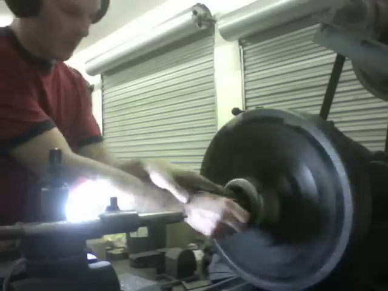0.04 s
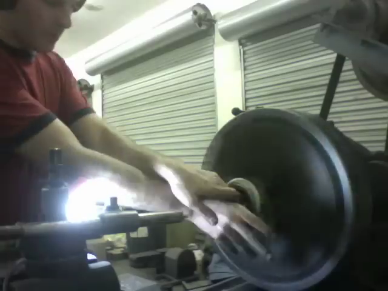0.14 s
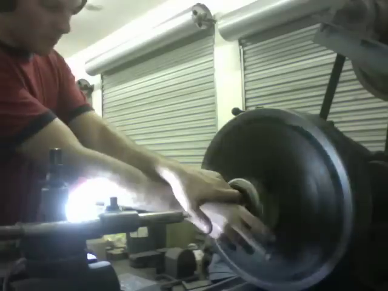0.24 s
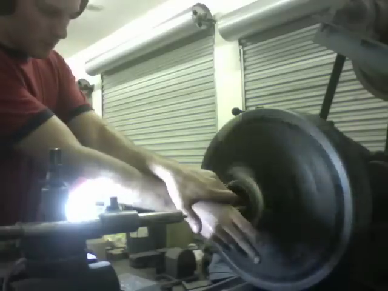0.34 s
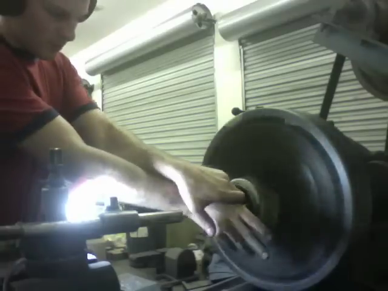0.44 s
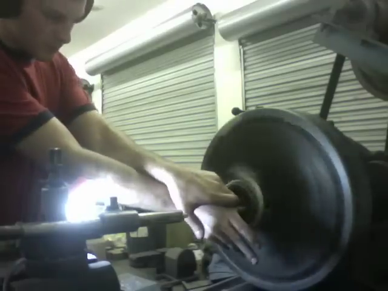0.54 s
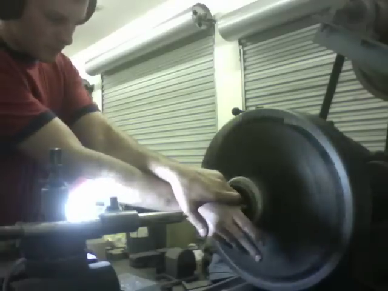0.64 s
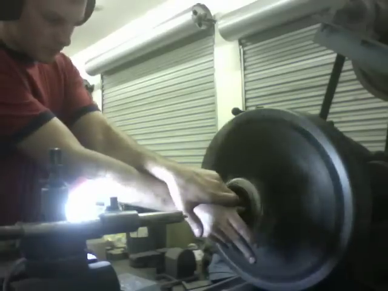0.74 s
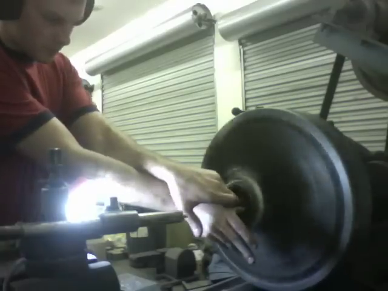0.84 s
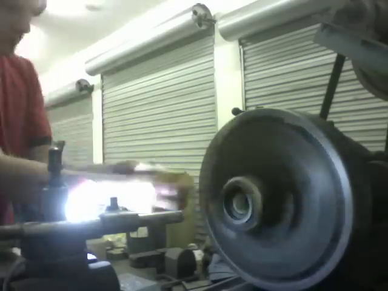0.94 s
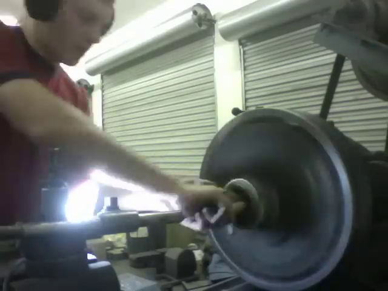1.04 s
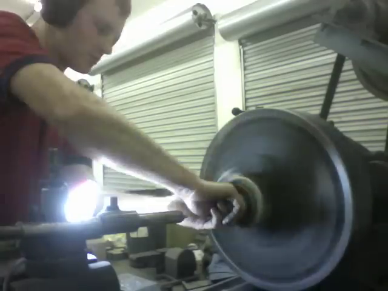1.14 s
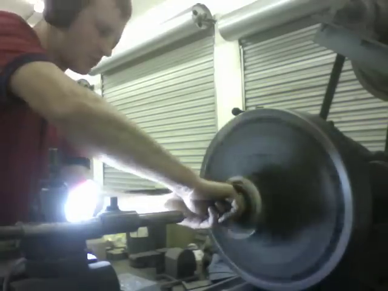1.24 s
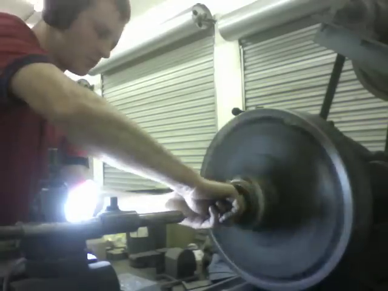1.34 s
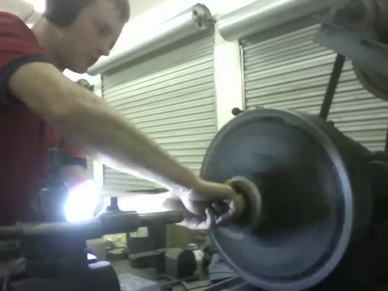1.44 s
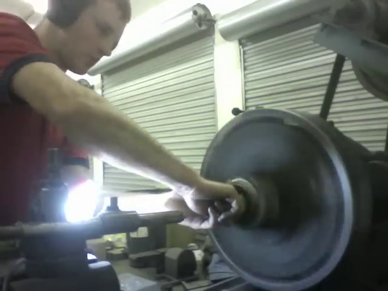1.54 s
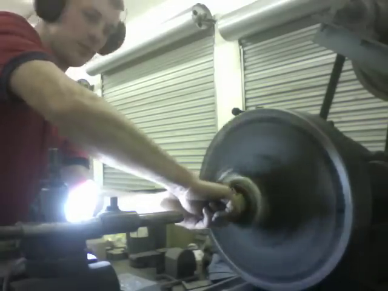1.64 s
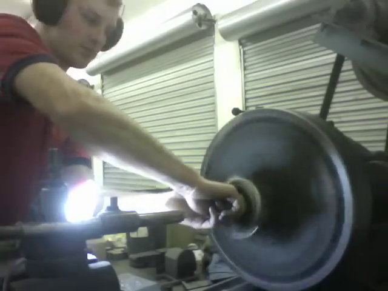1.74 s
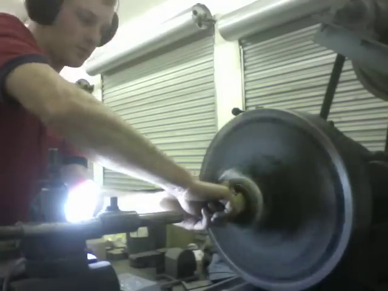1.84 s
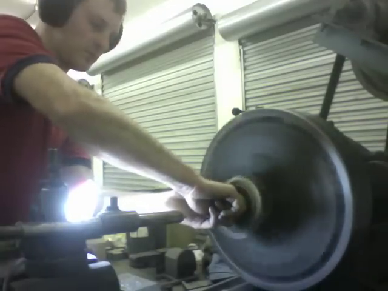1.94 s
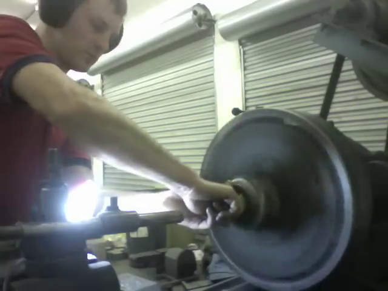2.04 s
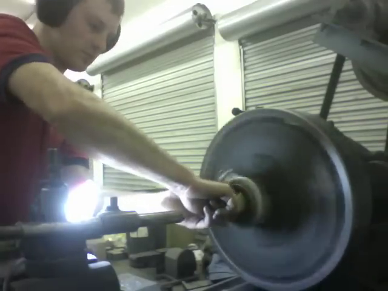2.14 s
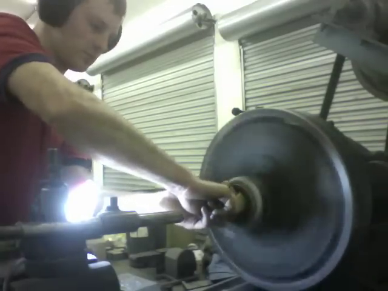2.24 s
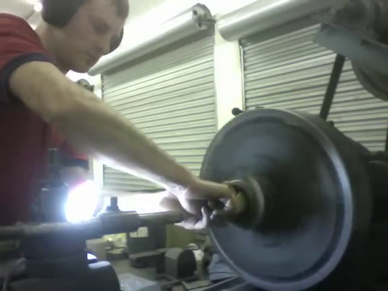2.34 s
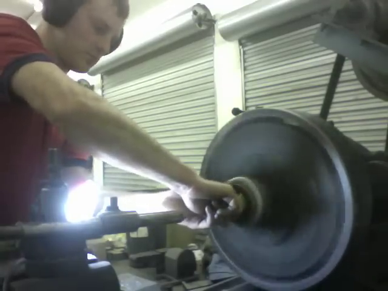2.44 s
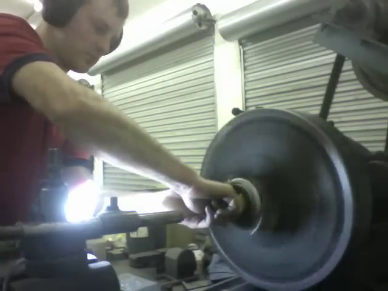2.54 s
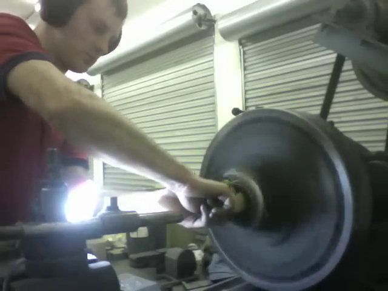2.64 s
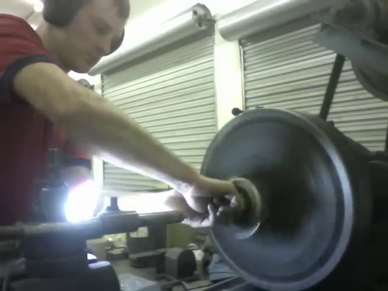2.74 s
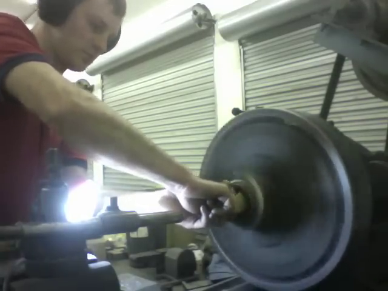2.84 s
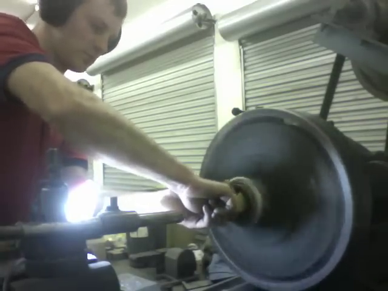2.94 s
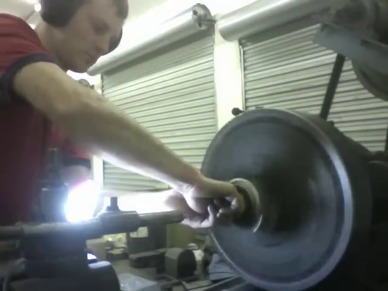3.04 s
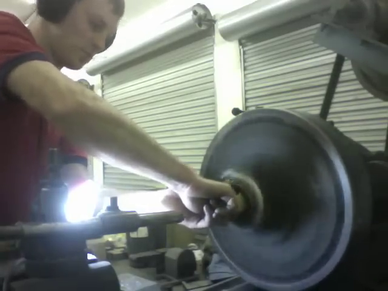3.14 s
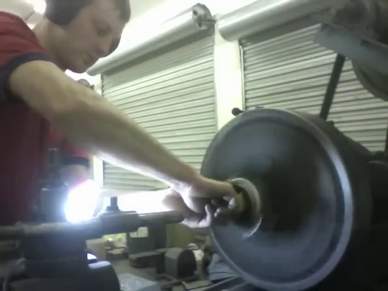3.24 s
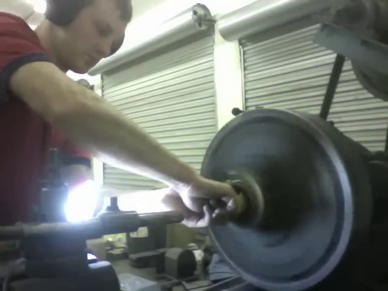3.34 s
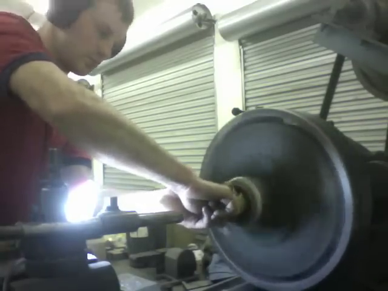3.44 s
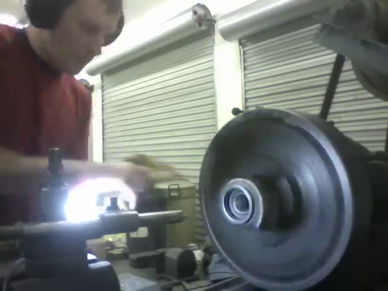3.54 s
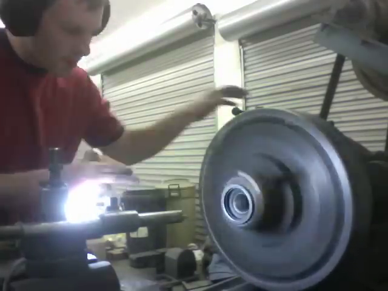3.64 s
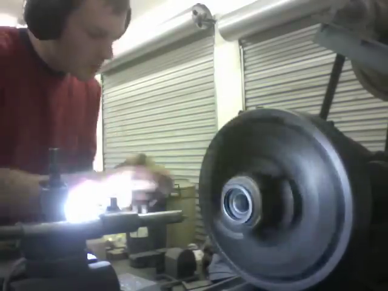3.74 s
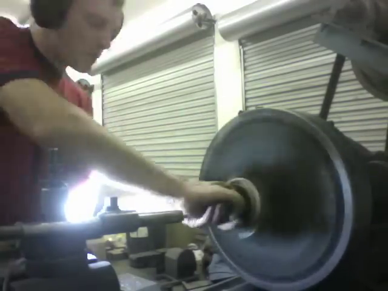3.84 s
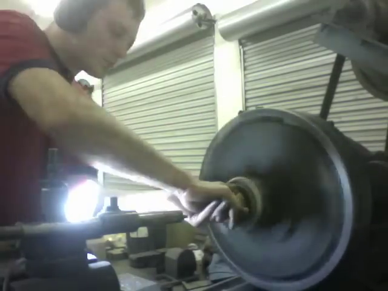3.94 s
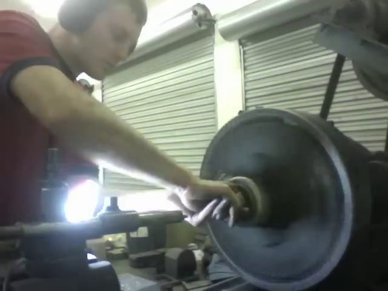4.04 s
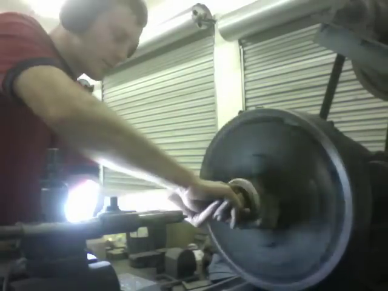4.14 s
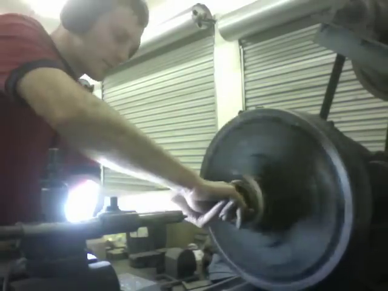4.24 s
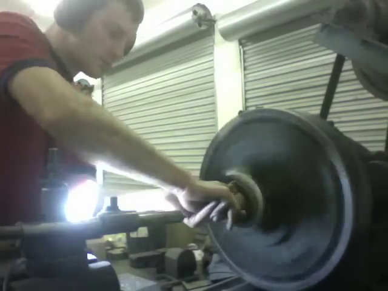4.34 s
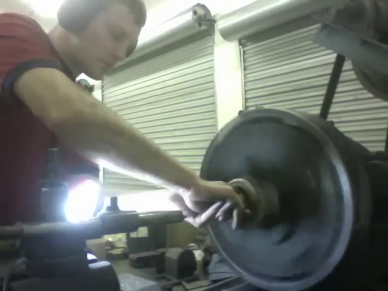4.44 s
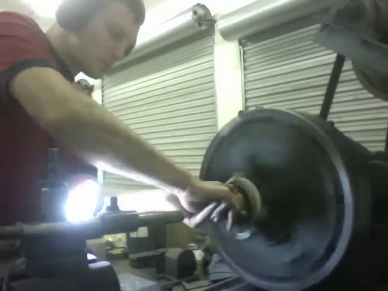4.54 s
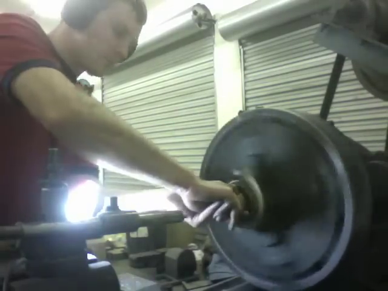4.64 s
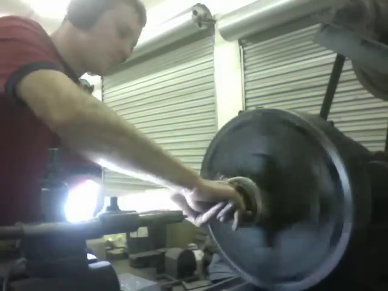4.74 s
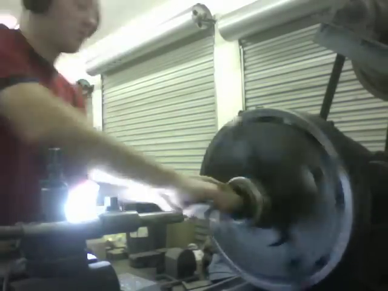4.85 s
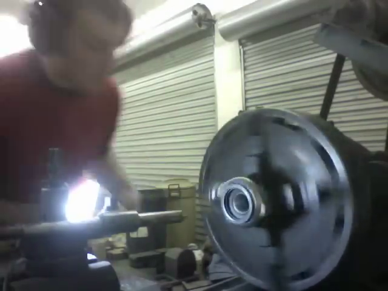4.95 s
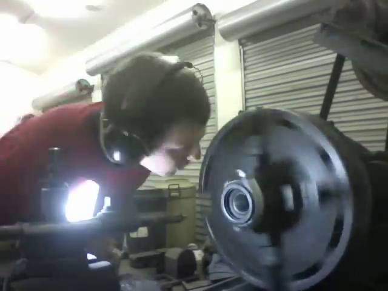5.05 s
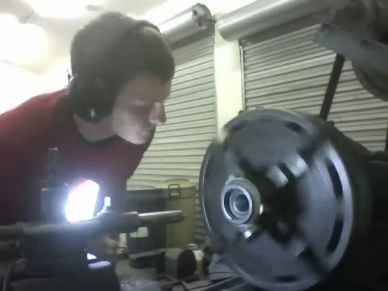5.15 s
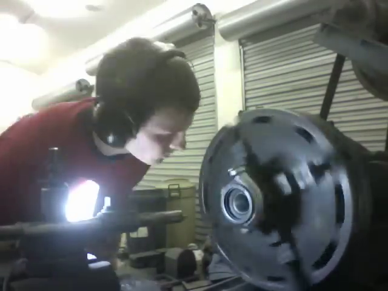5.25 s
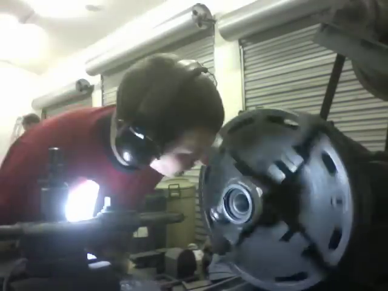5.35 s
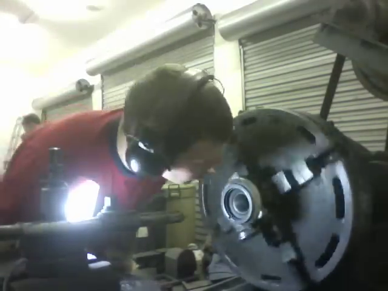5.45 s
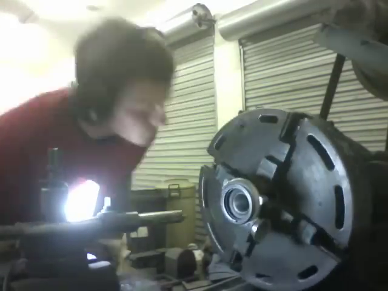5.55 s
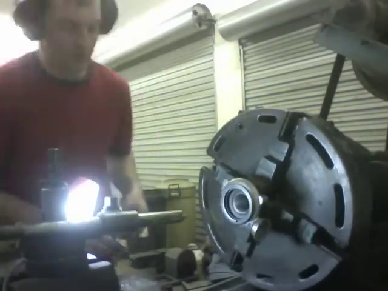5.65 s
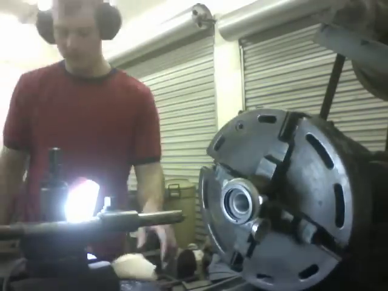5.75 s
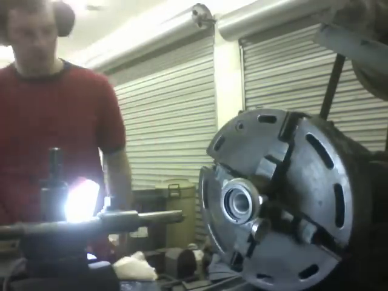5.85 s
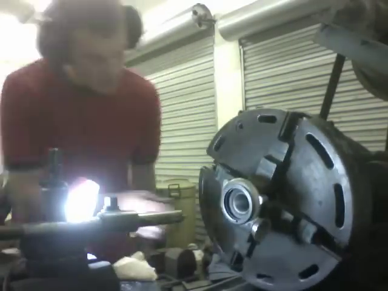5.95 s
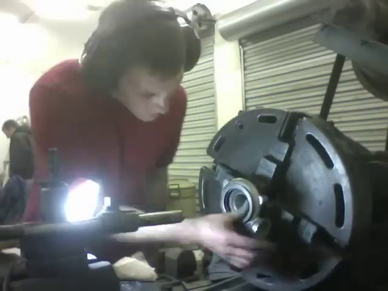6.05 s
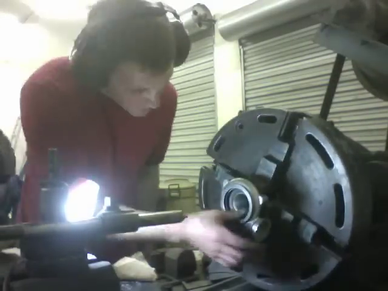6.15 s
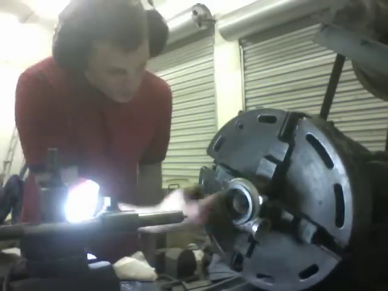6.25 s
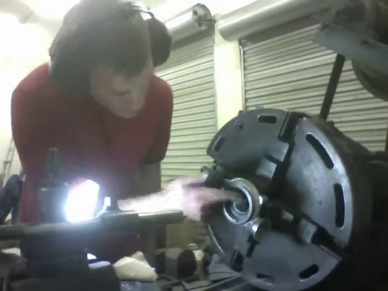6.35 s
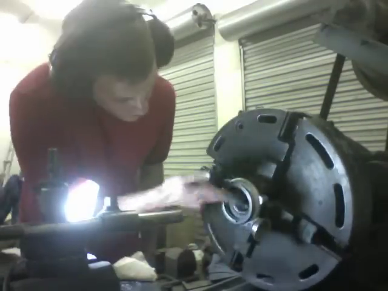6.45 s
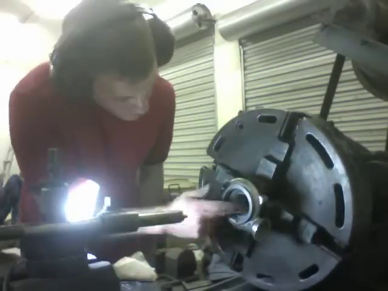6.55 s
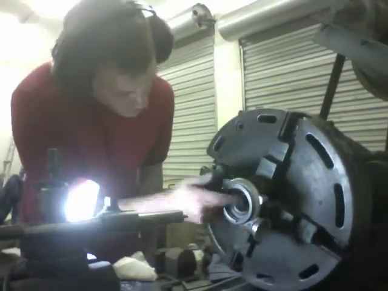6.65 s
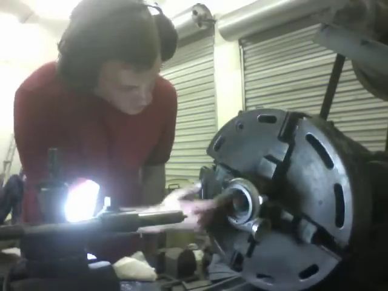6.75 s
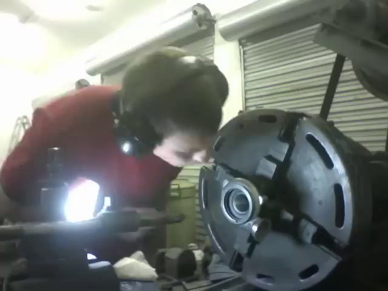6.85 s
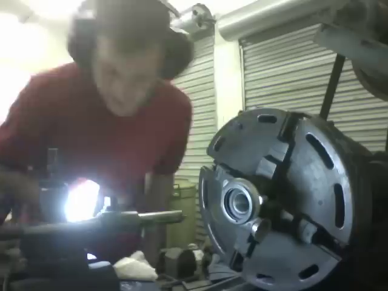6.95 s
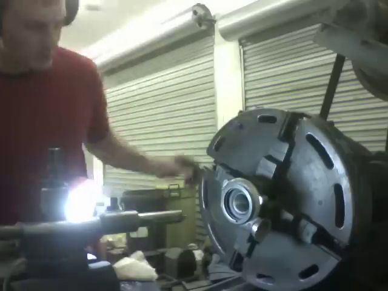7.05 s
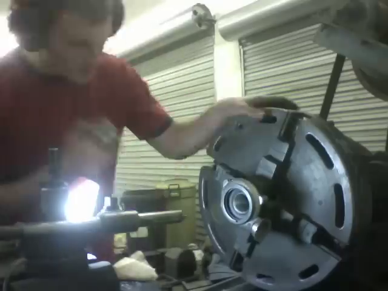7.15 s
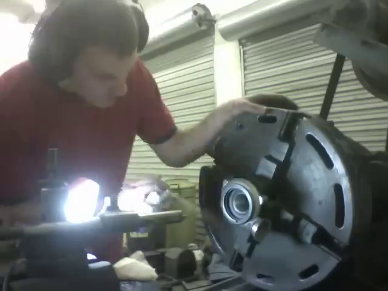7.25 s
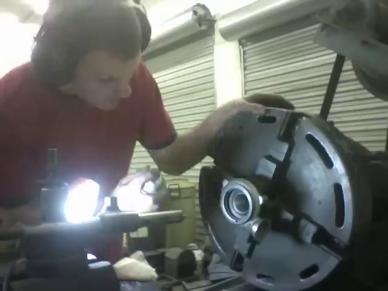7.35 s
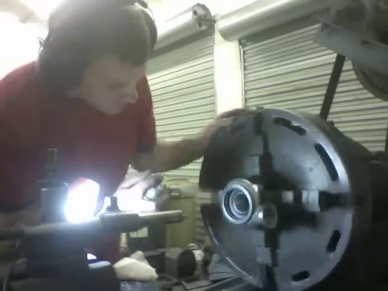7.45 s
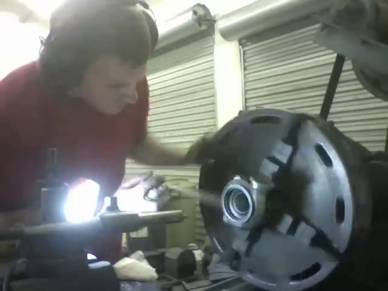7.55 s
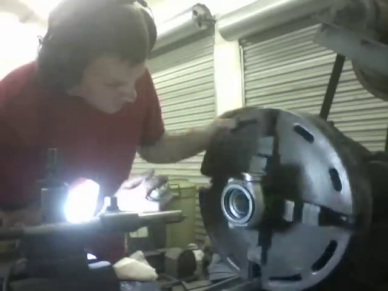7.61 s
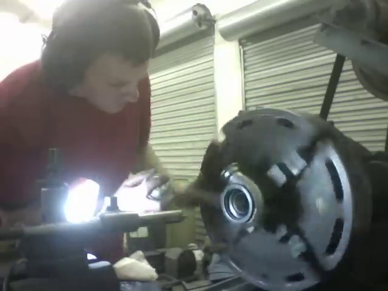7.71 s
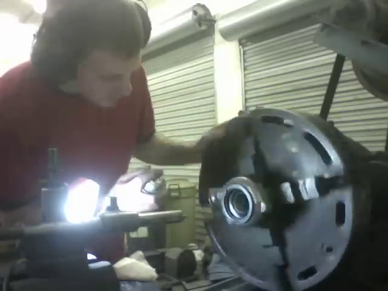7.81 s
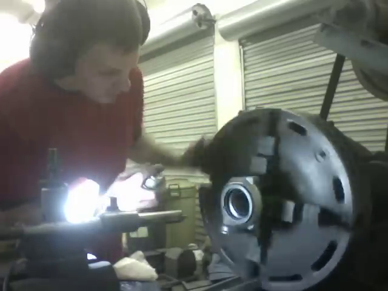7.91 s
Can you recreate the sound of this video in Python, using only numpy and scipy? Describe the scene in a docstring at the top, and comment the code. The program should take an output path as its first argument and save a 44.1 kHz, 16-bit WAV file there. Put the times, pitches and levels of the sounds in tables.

```python
"""Geared lathe: start, run, coast-down, hand turning

A geared metal lathe spins up and runs: sideband tones whine over rattling blows and hissing noise.
Switched off, it coasts to rest in an echoing workshop. Noise bursts make small parts tick and a lever clack.
The chuck is then turned by hand: gears rub (pulsed noise through casting modes), a dry bearing squeaks
(noise through its modes) and a pawl clicks (evenly spaced bursts)."""
import sys
import numpy as np
from scipy import signal
from scipy.fft import rfft, irfft, next_fast_len
from scipy.io import wavfile
from scipy.ndimage import uniform_filter1d, map_coordinates

SR = 44100
rng = np.random.default_rng(int(sys.argv[2]) if len(sys.argv) > 2 else 0)


def master(y):
    """Save y as 16-bit WAV."""
    cut = np.clip(np.atleast_2d(y).T, -1, 1)
    pcm = np.round(cut * 32767)  # scale
    wavfile.write(sys.argv[1], SR, pcm.astype(np.int16))


N = 351918
TIME = np.arange(N) / SR

# spectrum of slow gear teeth: (f/Hz, relative level/dB)
RASP_SPECTRUM = [(200, -53.5), (600, -36), (1000, -20.5), (1700, -0.5), (2600, -1.5), (3600, -0.5),
                 (4400, -5.5), (5500, -16), (8000, -30), (16000, -34)]
# resonances of the headstock casting: (f/Hz, width/Hz, relative level/dB)
HEADSTOCK_MODES = [(1880, 50, -7.5), (2477, 26, -8), (2620, 60, -12.5), (3080, 22, -3), (3484, 57, 0),
                   (3837, 50, -5), (3970, 33, 0), (4159, 28, -1.5), (4390, 22, -8), (4560, 80, -1.5),
                   (4760, 16, -7.5), (5061, 30, -9.5), (5280, 75, -11.5), (5787, 84, -14)]


def amp(db):
    """Decibels to gain."""
    return 10 ** (np.asarray(db) / 20)


def unit(x):
    """x at rms 1."""
    return x / np.sqrt(np.mean(np.abs(x) ** 2) + 1e-20)


def along(points, hz):
    """Interpolate (f/Hz, value) points on a log frequency axis."""
    f, v = np.transpose(points)
    return np.interp(np.log(hz + 1), np.log(f + 1), v)


def curve(points):
    """Interpolate (t/s, value) points at every sample."""
    t, v = np.transpose(points)
    return np.interp(TIME, t, v)


def wobble(rate_hz):
    """Smooth random curve with rate_hz knots a second."""
    knots = rng.standard_normal(int(N * rate_hz / SR) + 4)
    return map_coordinates(knots, [TIME * rate_hz])


def noise():
    """Fresh white noise."""
    return rng.standard_normal(N)


def filtered(x, response):
    """x times a complex response of frequency, padded against wrap-around."""
    m = next_fast_len(N + SR // 2)
    return irfft(rfft(x, m) * response(np.fft.rfftfreq(m, 1 / SR)), m)[:N]


def coloured(x, spectrum):
    """x shaped by a spectrum, at rms 1."""
    return unit(filtered(x, lambda hz: amp(along(spectrum, hz))))


def ringing(x, modes):
    """x through parallel resonances at rms 1; a high-pass models weak bass radiation."""
    def response(f):
        bank = 0
        for k, (centre, width, db) in enumerate(modes):
            resonance = 1j * f * width / (centre * centre - f * f + 1j * f * width)
            bank = bank + (-1) ** k * amp(db) * resonance
        return bank * f ** 4 / (f ** 4 + 1400 ** 4)
    return unit(filtered(x, response))


def impacts(rate_hz, scatter_db):
    """Irregular blows of scattered size, on average rate_hz a second, at rms 1."""
    struck = rng.random(N) < rate_hz / SR
    return unit(struck * noise() * amp(scatter_db * np.tanh(noise())))


def patchy(depth_db):
    """Noise whose level varies in smooth random patches of time and frequency."""
    z = signal.stft(noise(), nperseg=256)[2]
    field = uniform_filter1d(rng.standard_normal(z.shape), size=7, axis=0)
    field = uniform_filter1d(field, size=12, axis=1)
    return signal.istft(z * amp(depth_db * unit(field)), nperseg=256)[1][:N]


def strokes(rows):
    """Summed gain of smooth strokes (t/s, length/s, level/dB)."""
    return sum(amp(db) * np.exp(-2 * ((TIME - s) / length_s) ** 2) for s, length_s, db in rows)


def tones(lines, waver_rad):
    """Tones (f/Hz, rms level/dB) with slowly wandering phase."""
    out = np.zeros(N)
    for hz, db in lines:
        out += amp(db) * np.sqrt(2) * np.sin(2 * np.pi * hz * TIME + waver_rad * wobble(3.9))
    return out


def shop_hush():
    """The shop's own broadband noise, slowly drifting, plus the tones of distant machines."""
    # shop noise: (f/Hz, relative level/dB)
    spectrum = [(25, -27), (150, -28), (330, -24), (480, -13), (720, -4), (1500, -.5), (2400, 0),
                (3800, -4), (7000, -5.5), (11000, -7.5), (14000, -6), (15800, -9)]
    # distant machines: (f/Hz, rms level/dB)
    lines = [(721.4, -93), (974.4, -94)]
    level_db = -72 + .8 * wobble(5.6)
    return amp(level_db) * coloured(noise(), spectrum) + tones(lines, waver_rad=.7)


def workshop(x):
    """Wall echo: convolution with decaying noise whose decay time depends on frequency."""
    # reverberation: (f/Hz, t60/s)
    t60 = [(200, 0.22), (2000, 0.14), (8000, 0.086), (15000, 0.13)]
    hz, t, z = signal.stft(rng.standard_normal(SR // 2), SR, nperseg=256)
    decay = amp(-60 * t / along(t60, hz)[:, None])
    tail = signal.istft(z * decay, SR, nperseg=256)[1]
    return signal.fftconvolve(x, tail / np.linalg.norm(tail))[:N]


def knocks():
    """Dull bumps of the machine: short damped pulses of band-shaped noise."""
    # bumps: (t/s, level/dB, pitch f/Hz)
    bumps = [(2.084, -51, 1000), (4.684, -77, 250)]
    # bump spectrum: (multiple of pitch, relative level/dB)
    shape = [(0.049, -46), (.4, -32), (.7, -8), (1, 0), (1.5, 2), (4, -45)]
    out = np.zeros(N)
    for s, db, hz in bumps:
        age = np.maximum(TIME - s, 0) / 0.00394  # in units of the time to peak
        spectrum = [(hz * multiple, level_db) for multiple, level_db in shape]
        out += amp(db) * age * np.exp(1 - age) * coloured(noise(), spectrum)
    return out


def pawl():
    """A pawl on its ratchet: evenly spaced clicks of slightly uneven strength, as contact rows."""
    # runs: (first click t/s, end t/s, mean top level/dB)
    runs = [(7.274, 7.345, -51.5), (7.418, 7.64, -44.5), (7.678, 7.98, -47)]
    period_s, length_s, body_db, scatter_db = .0493, 0.0083, -13, 1  # body relative to top
    rows = []
    for first_s, end_s, mean_db in runs:
        for s in np.arange(first_s, min(end_s, TIME[-1]), period_s):
            db = mean_db + rng.normal(0, scatter_db)
            rows.append((s, db, db + body_db, length_s))
    return rows


def brushes(count):
    """Fingers brush the chuck: faint touches at random moments, as contact rows."""
    from_s, to_s, top_db, body_db, length_s = 6.3, 6.88, -66, -80, .012
    return [(from_s + u * (to_s - from_s), top_db, body_db, length_s) for u in rng.random(count)]


def contacts(rows, rise_s, tail_db, tail_s):
    """Gritty bursts (t/s, top level/dB, body level/dB, length/s): bright edge over duller body."""
    # bright edge: (f/Hz, relative level/dB)
    top_spectrum = [(200, -84.5), (1000, -46.5), (4000, -14.5), (7000, -5.5), (10000, 0.5), (12500, 4.5),
                    (15800, -1)]
    # duller body: (f/Hz, relative level/dB)
    body_spectrum = [(30, -42.5), (300, -34), (700, -13), (1500, -5.5), (4500, -2), (7500, 1),
                     (10000, -11.5), (15800, -25.5)]
    top, body = np.zeros((2, N))
    for s, top_db, body_db, length_s in rows:
        start = round(s * SR)
        t = TIME[:min(SR // 5, N - start)]
        decay = np.exp(-(t / length_s) ** 2) + amp(tail_db) * np.exp(-t / tail_s)
        shape = (1 - np.exp(-t / rise_s)) * decay
        top[start:][:len(t)] += amp(top_db) * shape
        body[start:][:len(t)] += amp(body_db) * shape
    bursts = top * coloured(patchy(depth_db=3), top_spectrum)
    bursts += body * coloured(patchy(depth_db=3), body_spectrum)
    # small parts radiate little bass
    return filtered(bursts, lambda hz: amp(along([(200, -25.5), (800, -1.5)], hz)))


def handling():
    """Small metal parts touch, the pawl clicks, and the lever clacks in snaps that each bounce once."""
    # touching parts: (t/s, top level/dB, body level/dB, length/s)
    ticks = [(5.066, -40.5, -63, 0.019), (5.1392, -55, -50, .006), (5.461, -48, -55.5, 0.017),
             (5.672, -48.5, -59, 0.024), (5.7435, -50.5, -69, .009), (5.7626, -45, -52.5, .01),
             (5.8396, -53.5, -52, .0074), (5.885, -56, -49.5, .0075), (5.9, -54, -53.5, 0.011),
             (6.07, -57, -59, 0.0098), (6.245, -65, -59.5, 0.013), (6.6495, -54, -63, 0.013),
             (6.8924, -46.5, -54, 0.0264), (6.9694, -50, -61.5, 0.014)]
    # lever snaps: (t/s, top level/dB, body level/dB)
    snaps = [(7.1215, -29, -36), (7.125, -20, -45), (7.1343, -20.5, -48), (7.144, -22, -31.5),
             (7.1581, -18.5, -40), (7.181, -27.5, -48), (7.216, -30, -48), (7.235, -35, -50.5)]
    rebound_s, rebound_loss_db, snap_length_s = 0.006, 9.5, .0007
    clicks = contacts(ticks + pawl() + brushes(count=8), rise_s=0.0012, tail_db=-26.5, tail_s=.014)
    clacks = []
    for s, top_db, body_db in snaps:
        for bounce in (0, 1):
            loss_db = bounce * rebound_loss_db
            clacks.append((s + bounce * rebound_s, top_db - loss_db, body_db - loss_db, snap_length_s))
    return clicks + contacts(clacks, rise_s=.0001, tail_db=-16, tail_s=.006)


def gear_rub():
    """Chuck pulled by hand: slow teeth catch and let go, rasping through the headstock."""
    # pulls: (t/s, length/s, relative level/dB)
    rubs = [(7.52, .05, -53.5), (7.742, .05, -50), (7.91, 0.038, -54)]
    catch_hz, catch_db, catch_rise_s = 48.3, 10.5, 0.0027  # mean rate, pulse height, time to peak
    roll_from_s, roll_rise_s, roll_db = 7.33, 0.11, -72  # gears keep rolling between pulls
    grit = patchy(depth_db=3) * amp(2.5 * wobble(260))
    rasp = coloured(grit, RASP_SPECTRUM) + amp(-2.5) * ringing(noise(), HEADSTOCK_MODES)
    cycles = np.cumsum(catch_hz * amp(1.5 * wobble(30))) / SR
    age = cycles % 1 / catch_hz / catch_rise_s
    pulls = amp(-6.5 + catch_db * age * np.exp(1 - age)) * strokes(rubs)
    rolling = amp(roll_db) * np.clip((TIME - roll_from_s) / roll_rise_s, 0, 1)
    return (pulls + rolling) * rasp


def bearing_squeaks():
    """Dry bearing: short strokes of noise ring its own modes."""
    # squeaks: (t/s, length/s, relative level/dB)
    squeaks = [(5.268, 0.0085, -44), (5.34, 0.0075, -60.5), (5.504, 0.016, -52.5), (5.523, 0.0213, -48),
               (7.555, 0.019, -56.5), (7.815, 0.0273, -47)]
    # bearing resonances: (f/Hz, width/Hz, relative level/dB)
    modes = [(3550, 180, -14), (4640, 150, -12), (5845, 49, 4), (6550, 280, -11.5), (7070, 158, -3.5),
             (8700, 200, -14), (13700, 1400, -20.5)]
    return amp(-1.0) * strokes(squeaks) * ringing(noise(), modes)


def motor():
    """Motor hum, fading at switch-off, plus one strain tone while it pulls the chuck up to speed."""
    # hum while powered: (f/Hz, rms level/dB)
    hum = [(384, -106), (829, -85), (851, -85), (959, -78), (1071, -82), (1190, -78)]
    off_s, fade_s = 3.74, .22
    strain_db, strain_hold_s, strain_fall_db_per_s = -65, .45, 100
    strain_level_db = strain_db - strain_fall_db_per_s * np.maximum(TIME - strain_hold_s, 0)
    strain = amp(strain_level_db) * tones([(959, 0)], waver_rad=0.46)
    powered = np.interp(TIME - off_s, [0, fade_s], [1, 0])
    return powered * (strain + tones(hum, waver_rad=0.953))


def start_up():
    """The drive slips and grinds in jolts while it takes up the load: dense blows with jumping level."""
    # grind: (t/s, mean level/dB)
    grind = [(0, -25), (.15, -26.5), (.3, -23.5), (.46, -22), (.53, -26.5), (.62, -29), (.72, -38.5),
             (.85, -46)]
    # grind spectrum: (f/Hz, relative level/dB)
    roar = [(300, -74.5), (1000, -41), (1850, -17), (2400, -6.5), (3200, -8.5), (3500, 6), (4200, 2.5),
            (5000, -1), (5900, -8.5), (6500, -19.5), (8200, -20), (9100, -0.5), (9900, -14), (10600, -11),
            (11600, -23.5), (14200, -14), (16000, -24.5)]
    jolts_db = np.interp(TIME, [.3, .55], [2, 5]) * np.tanh(wobble(130.3))
    slipping = np.interp(TIME, [.8, 1], [1, 0])
    blows = impacts(6000, scatter_db=7) + noise()
    return slipping * amp(curve(grind) + jolts_db) * coloured(blows, roar)


def load():
    """Motor effort: full at first, easing to 0 as the chuck nears its speed."""
    ease_s, at_speed_s = .15, 0.94
    return np.interp(TIME, [ease_s, at_speed_s], [1, 0])


def swell_rises():
    """Rattle and hiss swell, mostly while a hand presses: rises in dB that attack, hold, release."""
    # swells: (t/s, hold/s, release/s, rattle rise/dB, hiss rise/dB)
    swells = [(1.052, 0.14, 0.24, 4.5, 5.5), (3.854, 0.074, 0.264, 5, 4), (4.452, .05, .06, 3, 2),
              (4.645, 0.1, 0.1, 5.5, 5.5), (4.98, .14, .12, 4, 1)]
    attack_s = .04
    rattle_db, hiss_db = np.zeros((2, N))
    for s, hold_s, release_s, rattle_rise_db, hiss_rise_db in swells:
        corners_s = np.cumsum([0, attack_s, hold_s, release_s])
        shape = np.interp(TIME - s, corners_s, [0, 1, 1, 0])
        rattle_db += rattle_rise_db * shape
        hiss_db += hiss_rise_db * shape
    return rattle_db, hiss_db


def scuff():
    """Fine, bright fizz, mostly of a hand on the spinning work, that grows with the hiss swells."""
    # fizz: (f/Hz, relative level/dB)
    spectrum = [(3000, -39), (9000, -15), (11500, -1), (13300, -1), (14300, 4), (15800, -2)]
    level_db = -49  # at a hiss rise of 6 dB
    return amp(level_db) * (amp(swell_rises()[1]) - 1) * coloured(noise(), spectrum)


def gear_train(mesh_hz):
    """Teeth clatter in their backlash and ring the headstock; slow teeth rasp; bearings hiss."""
    # tooth clatter: (f/Hz, relative level/dB)
    teeth_spectrum = [(25, -46.5), (250, -48), (500, -43.5), (700, -33), (1050, -17), (1350, -16),
                      (1850, -7.5), (2100, -5), (2400, 1), (2750, 0.5), (3200, -8), (3500, 10.5),
                      (4100, 0.5), (4600, 1.5), (5500, -10), (6500, -17.5), (16000, -20.5)]
    # bearing hiss: (f/Hz, relative level/dB)
    hiss_spectrum = [(300, -71.5), (2000, -37.5), (5000, -0.5), (6800, -6.5), (8000, -5.5), (9030, 7),
                     (9900, -6), (11500, -8), (12700, -9.5), (14250, 1), (14700, -8), (15800, -6.5)]
    # base level/dB, rise per tenfold speed/dB, rise under full load/dB
    rattle_base_db, rattle_speed_db, rattle_load_db = -43.5, 17.5, 10.5
    hiss_base_db, hiss_speed_db, hiss_load_db = -41, 36, 8.5

    speed = mesh_hz / mesh_hz.max()
    blow_rate_hz = 900 + mesh_hz
    blows = (impacts(blow_rate_hz, scatter_db=-0.5) + 0.87 * noise()) * amp(1.2 * wobble(110))
    teeth = np.sqrt(0.2 + 0.85 * speed) * coloured(blows, teeth_spectrum)
    slow_blows = impacts(2000 + mesh_hz, scatter_db=-1.0)
    rasp = np.sqrt(1 - speed) * coloured(slow_blows, RASP_SPECTRUM)
    casting = ringing(impacts(blow_rate_hz, scatter_db=3.0) + .6 * noise(), HEADSTOCK_MODES)

    rattle_rise_db, hiss_rise_db = swell_rises()
    drift_db = .75 * wobble(9)
    decades = np.log10(speed)
    rattle_db = rattle_base_db + rattle_speed_db * decades + rattle_load_db * load()
    rattle_db += rattle_rise_db + drift_db
    hiss_db = hiss_base_db + hiss_speed_db * decades + hiss_load_db * load()
    hiss_db += hiss_rise_db + drift_db

    rattle = amp(rattle_db) * (amp(4.5) * teeth + amp(-0.5) * rasp + amp(1.1) * casting)
    hiss = amp(hiss_db) * coloured(.5 * blows + noise(), hiss_spectrum)
    turning = np.interp(TIME, [5.5, 5.65], [1, 0])
    return turning * (rattle + hiss)


def whine(mesh_hz):
    """Gear mesh: a tone with shaft-modulation sidebands, smeared by uneven teeth."""
    # mesh tone and sidebands: (offset at full speed f/Hz, relative level/dB)
    sidebands = [(-235, -3.5), (-115, -.5), (0, 7.5), (119, 2), (242.5, -3.5)]
    # smear around the mesh tone: (offset f/Hz, relative level/dB)
    skirt = [(5, 3.5), (60, -2.5), (125, -4), (180, -2), (250, -14), (350, -28), (900, -76.5)]
    # whine, strongest near casting resonances: (meshing rate f/Hz, base level/dB)
    level_by_rate = [(500, -150), (950, -81), (1330, -65.5), (2300, -60), (2520, -41), (2800, -44),
                     (3200, -45), (3430, -30.5), (3600, -32.5)]
    load_rise_db, swell_share = 7.5, 0.54  # swell_share: fraction of the rattle's swell in dB

    full_hz = mesh_hz.max()
    turns = 2 * np.pi * np.cumsum(mesh_hz / full_hz) / SR
    lines = np.zeros(N)
    for offset_hz, db in sidebands:
        lines += amp(db) * np.sin((full_hz + offset_hz) * turns + 0.69 * wobble(22))
    phase = full_hz * turns
    smear = coloured(noise(), skirt) * np.cos(phase) + coloured(noise(), skirt) * np.sin(phase)
    level_db = along(level_by_rate, mesh_hz) + load_rise_db * load() + swell_share * swell_rises()[0]
    level_db += 0.66 * wobble(25)
    return amp(level_db) * (amp(-7.0) * unit(lines) + amp(-4) * unit(smear))


def scene():
    """The lathe and the hands at it, with their echo, over the shop's hush."""
    # run-up, run and coast-down: (t/s, tooth-meshing rate f/Hz)
    speed = [(0, 2700), (.42, 3380), (.58, 3544), (.72, 3610), (3.7, 3604), (3.8, 3440), (3.96, 3045),
             (4.2, 2491), (4.55, 1660), (4.9, 1070), (5.2, 490), (5.36, 120), (5.6, 10)]
    mesh_hz = curve(speed)
    small = handling() + gear_rub() + bearing_squeaks()
    lathe = knocks() + motor() + start_up() + scuff() + gear_train(mesh_hz) + whine(mesh_hz)
    echo = workshop(amp(-8) * lathe + amp(-22) * small)
    return (lathe + small + echo + shop_hush())[None]


def record(dry):
    """Band limit: a steep low-pass, -6 dB at top_hz."""
    top_hz = 15800
    return filtered(dry[0], lambda hz: amp(np.interp(hz - top_hz, [-100, 0, 300], [0, -6, -100])))[None]


dry = scene()
out = record(dry)
master(out)
```